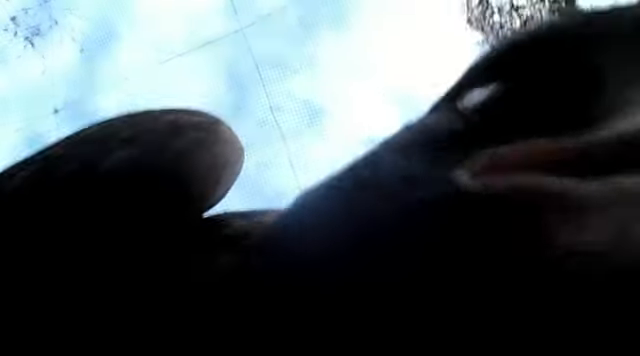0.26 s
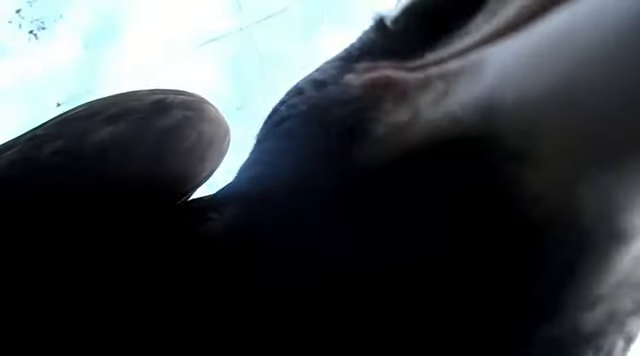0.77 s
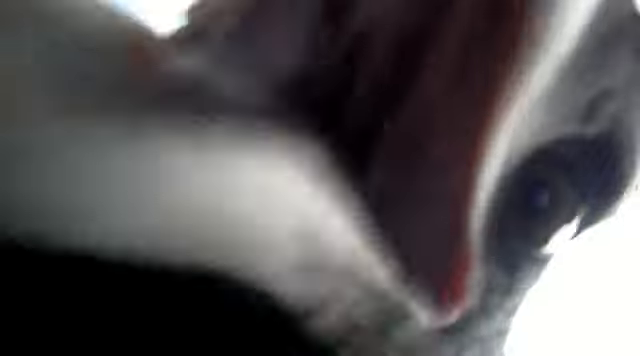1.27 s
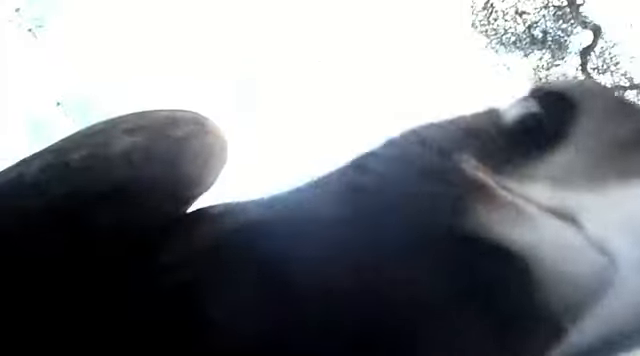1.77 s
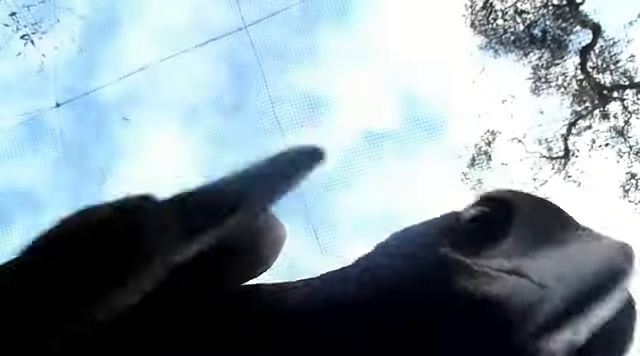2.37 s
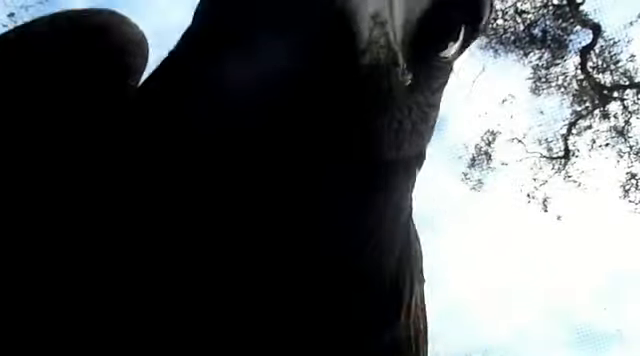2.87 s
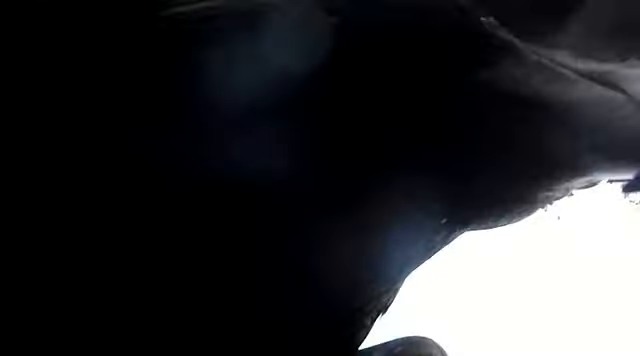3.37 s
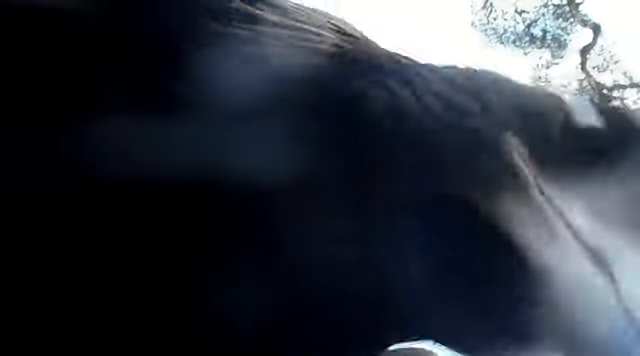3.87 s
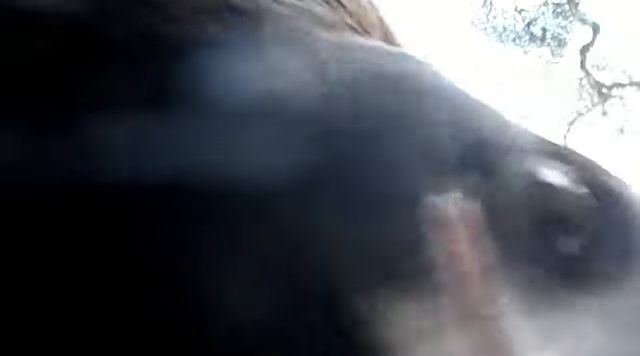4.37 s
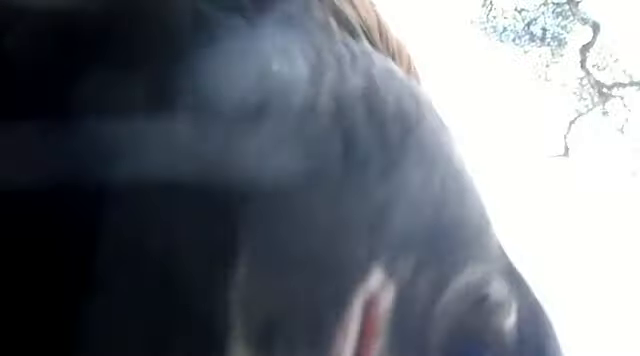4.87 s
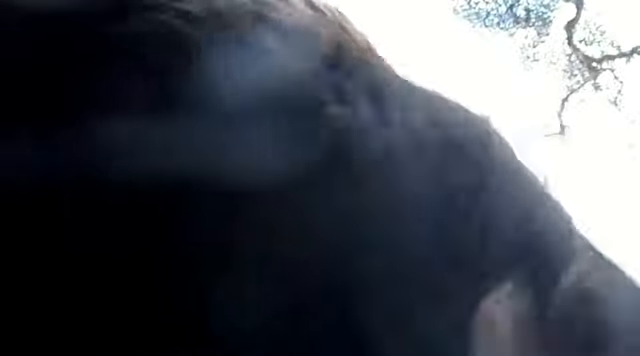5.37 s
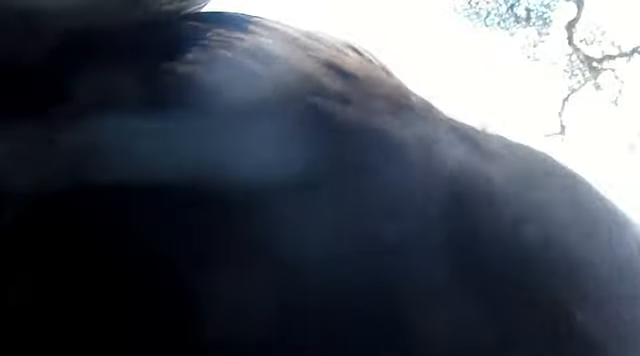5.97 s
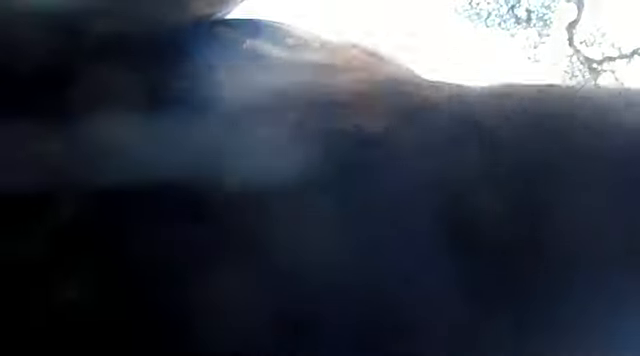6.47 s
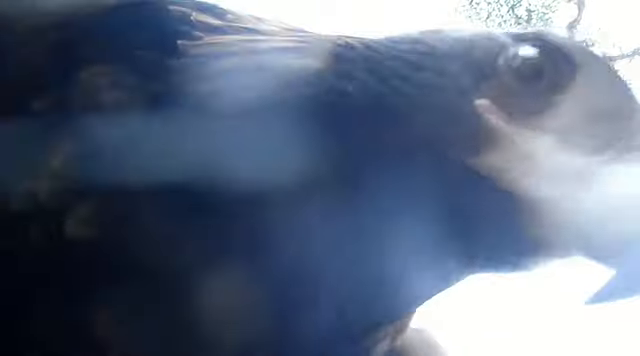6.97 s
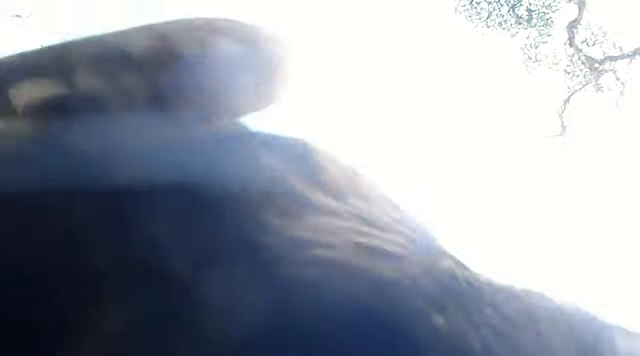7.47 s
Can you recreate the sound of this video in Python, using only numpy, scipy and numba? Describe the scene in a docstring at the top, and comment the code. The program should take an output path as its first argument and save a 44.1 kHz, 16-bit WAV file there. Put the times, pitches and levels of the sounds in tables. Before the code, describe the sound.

A bird of prey attacks a small plastic case outdoors, heard from inside it. Violent cracks, thumps and gritty scrapes come in clusters during the first second and a half. Faint ticks follow, with one sharp knock and squeak, then a dense run of pecking and scraping in the middle. Later only a short clatter and an isolated squeak break the quiet air noise, low hum and pulsing whine.

```python
"""A bird of prey pecks a small camera outdoors and drags beak and talons over its plastic case.
A knock is a brief force that rings the case and cavity modes, while its slower push rocks the whole camera.
A scrape is a train of stick-slip releases driving the same modes; light, fast ones squeak.
Gain control ducks after the blows; beneath lie faint ticks, outdoor noise, a low hum and a pulsing whine."""
import sys
import numpy as np
from scipy import signal
from scipy.fft import rfft, irfft, next_fast_len
from scipy.io import wavfile
from scipy.ndimage import uniform_filter1d
from numba import njit

SR = 44100
rng = np.random.default_rng(int(sys.argv[2]) if len(sys.argv) > 2 else 0)


def store_pcm(level_fs):
    """Save levels as 16-bit WAV."""
    pcm = np.round(np.clip(level_fs, -1, 1) * 32767).astype(np.int16)
    wavfile.write(sys.argv[1], SR, np.atleast_2d(pcm).T)


N = 340893
TIME = np.arange(N) / SR
SIZE = 8192  # samples in a ring or a contact force, which so lasts 0.19 s at most


def undb(db):
    """Level to gain: 20 dB is a factor of ten in amplitude."""
    return 10 ** (np.asarray(db) / 20)


def unit(x):
    """Normalisation to an rms of 1."""
    return x / np.sqrt(np.mean(x ** 2) + 1e-20)


def bins(size):
    """Discrete Fourier frequencies in Hz of that many samples, kept above zero."""
    return np.maximum(np.arange(size // 2 + 1) * SR / size, 1)


def add(track, s, sound):
    """Superposition: mix a sound in at time s."""
    i = max(int(s * SR), 0)
    track[i:i + len(sound)] += sound[:N - i]


def noise(gain_at):
    """Spectral shaping: steady noise of rms 1 filtered by a gain given as a function of frequency."""
    size = next_fast_len(N) * 2
    spectrum = rfft(rng.standard_normal(size)) * gain_at(bins(size))
    return unit(irfft(spectrum)[:N])


def wobble(rate):
    """Slow random modulation: random values joined by straight lines, rate of them a second."""
    knots = rng.standard_normal(SIZE)
    return np.interp(TIME[:SIZE] * rate, np.arange(SIZE), knots)


def low_pass(x, hz):
    """Elliptic filtering: a steep treble cut."""
    return signal.sosfilt(signal.ellip(10, .2, 70, hz, fs=SR, output="sos"), x)


def impulse(gain):
    """Minimum phase: the causal ring with this spectrum, faded out within a tenth of a second."""
    cepstrum = irfft(np.log(gain + 1e-4 * gain.max()))
    # folding the cepstrum onto positive time makes the ring causal
    cepstrum[1:SIZE // 2] *= 2
    cepstrum[SIZE // 2 + 1:] = 0
    fade = np.cos(np.pi * np.minimum(np.arange(SIZE) / SIZE, .5))
    return irfft(np.exp(rfft(cepstrum))) * fade


def strength(ring, db):
    """Onset level: set the rms of the first 5 ms."""
    head = ring[:SR // 200]
    return ring * undb(db) / np.sqrt(np.mean(head ** 2))


def resonate(hz, modes):
    """Modal response: the gain of resonances that add in power."""
    power = 0
    for f, width, db in modes:
        power = power + undb(db) ** 2 / (1 + ((hz ** 2 - f ** 2) / (hz * width)) ** 2)
    return np.sqrt(power)


def ripple(hz, depth_db, echo_s):
    """Comb interference: each contact point's short reflections inside the case make random peaks and dips."""
    lags = rng.uniform(.2, 1, 12) * echo_s
    swing = rng.standard_normal(len(lags)) @ np.cos(2 * np.pi * lags[:, None] * hz)
    return undb(depth_db * unit(swing))


def after_ring(hz, t60_s, db):
    """Exponential decay of one lightly damped mode, falling 60 dB in t60_s."""
    t = TIME[:SIZE]
    return undb(db) * np.sin(2 * np.pi * hz * t) * np.exp(-np.log(1000) * t / t60_s)


# Resonances of the case and the microphone cavity.
# Each row: frequency in Hz, width in Hz, relative level in dB.
CASE_MODES = [(507, 250, -37.5), (872, 87, -13.5), (1420, 340, -10.5), (2100, 350, -34), (2270, 400, -17.5),
              (2860, 155, 4.5), (3286, 180, -5), (5755, 250, -7.5), (7000, 400, -26), (7860, 1400, -33.5),
              (11580, 2600, -44)]
WALL_HZ, WALL_OCTAVES = 2122, 0.38  # centre and spread of the wall's ring
WALL_LOSS = 0.55  # dB of wall ring lost per dB of brightness


def case_gain(hz, wall_db, treble_db, edge_hz=4500):
    """Mode coupling: the spot touched decides how much the wall sounds, a sharp tip adds treble."""
    wall = np.exp(-.5 * (np.log2(hz / WALL_HZ) / WALL_OCTAVES) ** 2)
    treble = 1 / (1 + (edge_hz / hz) ** 4)
    return resonate(hz, CASE_MODES) * undb(wall_db * wall + treble_db * treble)


# Resonances of the whole camera rocking on the ground.
# Each row: frequency in Hz, width in Hz, relative level in dB.
ROCKING_MODES = [(55, 100, -1), (108.8, 87, -1), (178.4, 32, 2), (290, 180, -8), (496, 2100, -19.5)]


def rocking_gain(hz):
    """Rigid-body resonance: how readily the whole camera rocks at each frequency."""
    return resonate(hz, ROCKING_MODES)


# Spectrum of outdoor noise as it comes through the microphone cavity.
# Each row: frequency in Hz, relative density in dB per Hz.
AIR_SPECTRUM = [(30, -0.5), (90, -8.5), (160, -6), (260, -6.5), (560, -14), (760, -11), (1120, -10.5),
                (1520, -9), (2150, -13.5), (2620, -5.5), (2850, 0.5), (3150, -12), (3950, -24),
                (14000, -26)]
AIR_DB = -54
# A faint low hum that swells and fades.
# Each row: time in seconds, level in dB.
HUM_LEVEL = [(0, -86.5), (2.0, -80), (2.4, -63), (3.0, -65), (3.6, -71.5), (5.5, -74), (7.7, -72.5)]
HUM_HZ, HUM_WIDTH_HZ = 156.1, 12


def outdoors():
    """Stationary broadband noise, even and distant, beside a narrow-band hum."""
    points_hz, points_db = np.transpose(AIR_SPECTRUM)
    air = noise(lambda hz: undb(np.interp(np.log(hz), np.log(points_hz), points_db)))
    hum = noise(lambda hz: resonate(hz, [(HUM_HZ, HUM_WIDTH_HZ, 0)]) ** 2)
    hum_db = np.interp(TIME, *np.transpose(HUM_LEVEL))
    return air * undb(AIR_DB) + hum * undb(hum_db)


# Bursts the whine leaves out. Each entry: time in seconds.
MISSED_BURSTS = [5.73, 5.865, 6.2, 6.4, 6.53, 6.665]
WHINE_HZ, WHINE_DB = 5723, -66
BURSTS_PER_S, BURST_DUTY = 15.02, .62  # duty is the sounding fraction of each cycle


def whine(centre_s=.0056):
    """Gated pure tone: the camera's electronics whine in short, regular bursts and now and then miss one."""
    on = np.cos(2 * np.pi * BURSTS_PER_S * (TIME - centre_s)) > np.cos(np.pi * BURST_DUTY)
    for s in MISSED_BURSTS:
        on = on & (np.abs(TIME - s) > .5 / BURSTS_PER_S)
    gate = uniform_filter1d(on * 1., size=130)  # 3 ms ramps
    return undb(WHINE_DB) * gate * np.sin(2 * np.pi * WHINE_HZ * TIME)


# The span in which the bird shuffles its feet: start in seconds, end in seconds.
SHUFFLE_SPAN = (2.0, 4)


def fidgets(rate=20, click_db=-52, thump_db=-60, scatter_db=5.0, wall_db=17):
    """Random impulsive excitation: faint, dull ticks and bumps as the feet shift their grip."""
    hz, out = bins(SIZE), 0
    restless = (TIME > SHUFFLE_SPAN[0]) & (TIME < SHUFFLE_SPAN[1])
    tick = case_gain(hz, wall_db, -4) / np.hypot(1, (hz / 3500) ** 4)
    bump = rocking_gain(hz) / np.hypot(1, hz / 120)
    for gain, db in ((tick, click_db), (bump, thump_db)):
        happens = restless * (rng.random(N) < rate / SR)
        taps = happens * undb(scatter_db * np.clip(rng.standard_normal(N), -2, 2))
        out = out + signal.fftconvolve(taps, strength(impulse(gain), db))[:N]
    return out


def slips(rate, scatter_db):
    """Stick-slip friction: tiny releases at random moments and of very uneven size."""
    happens = rng.random(SIZE) < rate / SR
    return happens * rng.standard_normal(SIZE) * undb(scatter_db * rng.standard_normal(SIZE))


# Skid after a knock: times in ms, levels relative to the weaker of its click and thump
SKID_PRESS_MS, SKID_EASE_MS, SKID_DB, SKID_RUMBLE_DB = 1.7, 28.4, -13.5, -13


def skids():
    """Sliding after impact: a short scrape that needs both a hard tip and weight behind it."""
    rows = []
    for s, click_db, thump_db, bright_db in KNOCKS:
        grip_db = min(click_db, thump_db)
        rows.append((s, SKID_PRESS_MS, SKID_EASE_MS, grip_db + SKID_DB, grip_db + SKID_RUMBLE_DB, bright_db))
    return rows


# Scrapes of beak and talons.
# Each row: start in seconds, pressing in ms, easing off in ms, level in dB, rumble in dB, brightness in dB.
SCRAPES = [ (.017, 22.8, 3.6, -16, -20.5, 17), (.242, 43.3, 27.4, 4.5, -7, 5),
           (.602, 21, 50, -19.5, -18, 2.5), (.899, 11.6, 27.5, -5, -15.5, 5),
           (.967, 11.4, 56, -17, -22, 11), (1.268, 5.5, 110, -16.5, -24.5, 6.5),
           (1.392, 4.6, 59, -30.5, -39.5, 6.5), (2.109, 32, 290, -48, -46.5, -0.5),
           (2.215, 27.5, 6.8, -32, -41, 1.5), (2.302, 12.4, 20, 0, -40, 4.5),
           (2.613, 14, 26, -41.5, -52, 1), (3.451, 48, 28, -39.5, -44.5, 9), (3.819, 7, 15, -11, -32, -5),
           (3.861, 20, 21, -33.5, -42.5, 1), (4.004, 3, 15.4, -26, -41, -5),
           (4.036, 14.5, 31, -32.5, -40.5, -0.5), (4.192, 37.3, 17.5, -9.5, -21, 4),
           (4.359, 60, 59, -14.5, -27.5, -0.5), (4.436, 29.4, 54.7, -7, -26, 11),
           (4.507, 20, 27, -27, -29, 6.5), (4.547, 25.5, 7.6, -19.5, -41, 11.5),
           (4.644, 27, 8.1, -33, -40, -6), (4.685, 28, 111, -15.5, -23, -1.5),
           (4.793, 24.6, 31.6, 0, -21.5, 6.5), (4.935, 13.7, 56, -12.5, -22.5, 0),
           (5.05, 30.5, 95, -13, -17.5, 1.5), (5.15, 37.3, 29.3, -16, -30, -4),
           (5.263, 27, 190, -33.5, -50.5, -6), (5.345, 38, 13.4, -2, -37.5, -7.5),
           (6.168, 32, 14, -13.5, -22, 3), (6.74, 39, 115, -52.5, -56, -1.5),
           (6.906, 22.5, 10, 1.5, -35, -4), (7.254, 6, 110, -40, -50, 1.5)]
SCRAPE_WALL_DB, SCRAPE_TREBLE_DB = 12, -2.5
PRESS_POWER, EASE_POWER = 0.87, 1  # pressure rises and falls as these powers of time
# Cavity squeak: dB of boost for each dB by which level minus rumble exceeds the threshold
SQUEAK_HZ, SQUEAK_WIDTH_HZ, SQUEAK_GAIN, SQUEAK_FROM_DB = 2810, 160, 0.56, 18


def scrapes(bass_cut_hz=1100, hollow_hz=4850, hollow_width_hz=600, hollow_db=-8, dull_hz=11500, catch_db=3.5):
    """Friction-driven resonance: slips of horn on plastic swell with pressure, ring the case and shake the camera."""
    out, hz, t = np.zeros(N), bins(SIZE), TIME[:SIZE]
    # sliding contact is weak in the bass and hollow between the two cavity modes
    friction = undb(hollow_db * np.exp(-.5 * ((hz - hollow_hz) / hollow_width_hz) ** 2))
    friction = friction / np.hypot(1, bass_cut_hz / hz) / np.hypot(1, (hz / dull_hz) ** 4)
    shake = impulse(rocking_gain(hz) / np.hypot(1, (hz / 850) ** 2) / np.hypot(1, 90 / hz))
    shake = shake / np.linalg.norm(shake)
    for start, press_ms, ease_ms, db, rumble_db, bright_db in list(SCRAPES) + skids():
        hardest = press_ms / 1000
        end = hardest + ease_ms / 1000
        power = np.where(t < hardest, PRESS_POWER, EASE_POWER)
        pressure = np.interp(t, [0, hardest, end], [0, 1, 0]) ** power
        # the tip catches and lets go, so the slips come in crunchy bunches
        bunches = slips(rate=4000, scatter_db=1.5) * undb(catch_db * wobble(rate=170))
        force = unit(bunches) * pressure
        case = case_gain(hz, SCRAPE_WALL_DB - WALL_LOSS * bright_db, SCRAPE_TREBLE_DB + bright_db)
        # a light, fast scrape that hardly shakes the camera squeaks at the cavity's note
        squeak_db = SQUEAK_GAIN * max(db - rumble_db - SQUEAK_FROM_DB, 0)
        case = case * undb(squeak_db / (1 + ((hz - SQUEAK_HZ) / SQUEAK_WIDTH_HZ) ** 2))
        # the tip wanders between two spots that ring differently
        spot = wobble(rate=70) > 0
        for here in (spot, ~spot):
            ring = impulse(case * friction * ripple(hz, depth_db=2.0, echo_s=0.0019))
            ring = ring / np.linalg.norm(ring)
            body = undb(db) * ring + undb(rumble_db) * shake
            add(out, start, signal.fftconvolve(force * here, body))
    return out


# Knocks of beak and talons.
# Each row: start in seconds, click level in dB, thump level in dB, brightness in dB.
KNOCKS = [ (.0045, -21.5, -20.5, 9.5), (.034, -48.5, 7.5, 3.5), (.241, 5.5, 15.5, 1),
          (0.2933, -4.5, -19, 20), (.5904, 8.5, 0.5, 6.5), (0.6019, 2.5, 4.5, 16), (0.6301, 3, -10, 7.5),
          (.646, 0.5, -17.5, 7.5), (0.6634, 0, -24, 0.5), (.862, -1.5, -18.5, -6.5),
          (0.889, -13.5, -21.5, 2.5), (0.9071, 3.5, -3, -7), (.9637, -1.5, -11, -1),
          (0.9857, -15, -9.5, -7), (0.9902, -4, -10, 1), (1.2244, -1, 2.5, -10.5),
          (1.2687, 4.5, -4.5, 15.5), (1.2866, -0.5, -5.5, -6.5), (1.316, -4, -13, 4), (1.321, 8, -31, -6),
          (1.34, -2.5, -20, -1), (1.393, -23.5, -63, 1), (2.2558, -10, -28.5, -21.5),
          (2.2698, 9.5, -10.5, 11.5), (2.631, -35, -47, -4.5), (2.7055, -36, -69, -12),
          (2.847, -33.5, -71, -13), (3.1494, -39, -59, -0.5), (3.352, -44.5, -65, 6),
          (3.6332, -41, -60, -11), (3.8165, 0, -10, -22), (4.0045, -24.5, -65, -1.5),
          (4.0421, -27, -46.5, -7.5), (4.0611, -25.5, -44, -13.5), (4.084, -37, -53, 15.5),
          (4.1636, 4, 6, 12.5), (4.185, -12.5, -19, 9.5), (4.3611, -17.5, -26, -17), (4.3955, 5.5, 0.5, -3),
          (4.4052, -16.5, -7.5, 19), (4.4934, -5.5, -17, 2.5), (4.6442, -26.5, -48, 0),
          (4.6816, 4, -6.5, -1), (4.813, 0.5, -48, -1), (4.9172, -10.5, -17, -5), (4.9901, -18, -16.5, -20),
          (5.0249, -2, -8.5, -14), (5.064, -15, -10.5, -16), (5.0746, -26, -14, -6),
          (5.0828, -3.5, -7.5, -20.5), (5.108, -19, -17.5, 6), (5.2604, -15, -50, -12.5),
          (5.8141, -41, -56, 17), (6.1377, 3, 1, 4), (6.1562, -4.5, -9.5, -4.5), (6.191, -3, -27, -3),
          (6.208, -34, -16.5, 1)]
KNOCK_WALL_DB, KNOCK_TREBLE_DB = 2, -6.5
BODY_HZ, BODY_LOSS = 1190, 0.3  # below this corner, dB lost per dB of brightness
PUSH_MS, PUSH_DOUBLING_DB = 1.05, 15.5  # push when click equals thump; excess thump that doubles it
# the housing hums on after a thump: level relative to the thump, for the push that drives it best
BOOM_HZ, BOOM_T60_S, BOOM_DB = 170, 0.046, -15.5
# and sings faintly after a click: level relative to the click
SING_HZ, SING_T60_S, SING_DB = 3650, 0.19, -58


def knocks(chatter=0.3, chatter_s=0.002, chatter_top_hz=3500, dull_hz=13000, damping_s=0.05,
           thump_top_hz=1100, thump_low_hz=60):
    """Impact excitation: a hard tip chatters and rings the case, its slower push rocks the camera."""
    out, hz, t = np.zeros(N), bins(SIZE), TIME[:SIZE]
    for s, click_db, thump_db, bright_db in KNOCKS:
        # the rebounds are softer than the first touch
        rebounds = signal.lfilter(*signal.butter(1, chatter_top_hz, fs=SR), rng.standard_normal(SIZE))
        contact = chatter * rebounds * np.exp(-t / chatter_s)
        contact[0] += 1
        case = case_gain(hz, KNOCK_WALL_DB - WALL_LOSS * bright_db, KNOCK_TREBLE_DB + bright_db)
        # a sharp tip moves the case's low modes less
        case = case * undb(-BODY_LOSS * bright_db * np.exp(-(hz / BODY_HZ) ** 2))
        colour = case * ripple(hz, depth_db=3.0, echo_s=0.001133) / np.hypot(1, (hz / dull_hz) ** 4)
        click = signal.fftconvolve(contact, impulse(colour) * np.exp(-t / damping_s))[:SIZE]
        # a dead blow, more thump than click, pushes for longer
        push_ms = PUSH_MS * 2 ** ((thump_db - click_db) / PUSH_DOUBLING_DB)
        # a push best drives the modes whose quarter period it lasts
        quarters = 4 * hz * push_ms / 1000
        push = quarters / (1 + quarters ** 2) / np.hypot(1, thump_low_hz / hz)
        rocking = rocking_gain(hz) * push * ripple(hz, depth_db=3.5, echo_s=0.0022)
        thump = impulse(rocking / np.hypot(1, (hz / thump_top_hz) ** 2))
        boom_drive = np.interp(BOOM_HZ, hz, push / push.max())
        boom = boom_drive * after_ring(BOOM_HZ, BOOM_T60_S, thump_db + BOOM_DB)
        sing = after_ring(SING_HZ, SING_T60_S, click_db + SING_DB)
        # thump and boom start with the opposite sign to the click
        add(out, s, strength(click, click_db) + sing - strength(thump, thump_db) - boom)
    return out


def scene():
    """Linear superposition: every source reaches one microphone inside the case."""
    return (outdoors() + whine() + fidgets() + scrapes() + knocks())[None]


@njit
def follow(x, attack, release):
    """Envelope detection: a level that rises fast and sinks slowly."""
    out, e = np.empty(len(x)), 0.
    for i in range(len(x)):
        e += (abs(x[i]) - e) * (attack if abs(x[i]) > e else release)
        out[i] = e
    return out


# dry_top_hz limits the treble before ducking and clipping, top_hz after them
def record(dry, limit_db=-9, attack_s=0.0013, release_s=0.11, dry_top_hz=14100, top_hz=14600):
    """Dynamic compression: gain ducks after each blow, too late for its first cycles, which clip; the top is cut."""
    limited = low_pass(dry, dry_top_hz)
    envelope = follow(limited[0], 1 / (attack_s * SR), 1 / (release_s * SR))
    ducked = limited / np.maximum(envelope / undb(limit_db), 1)
    clipped = ducked / (1 + (ducked / .69) ** 6) ** (1 / 6)  # soft ceiling at 0.69
    return low_pass(clipped, top_hz)


dry = scene()
out = record(dry)
store_pcm(out)
```